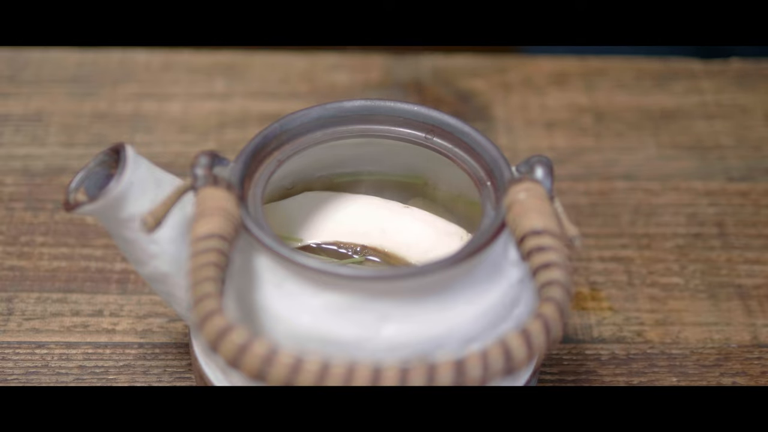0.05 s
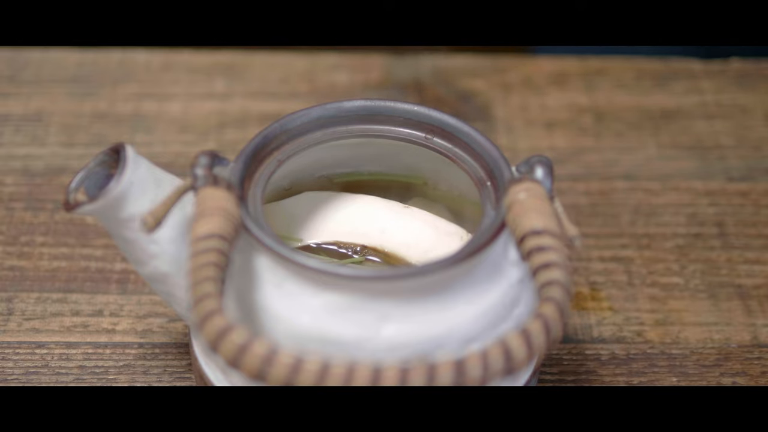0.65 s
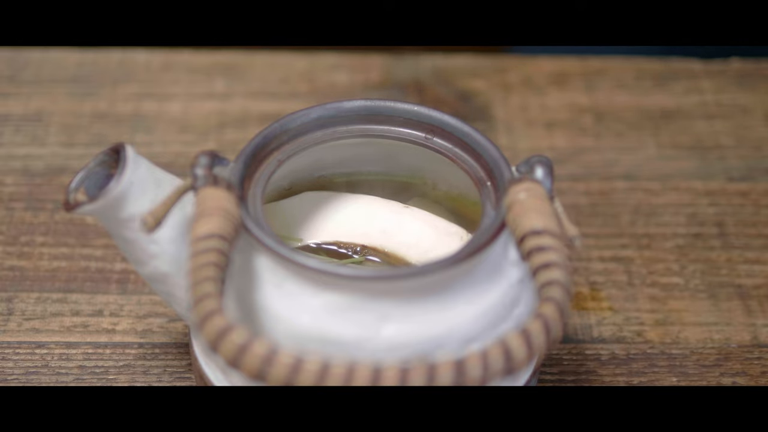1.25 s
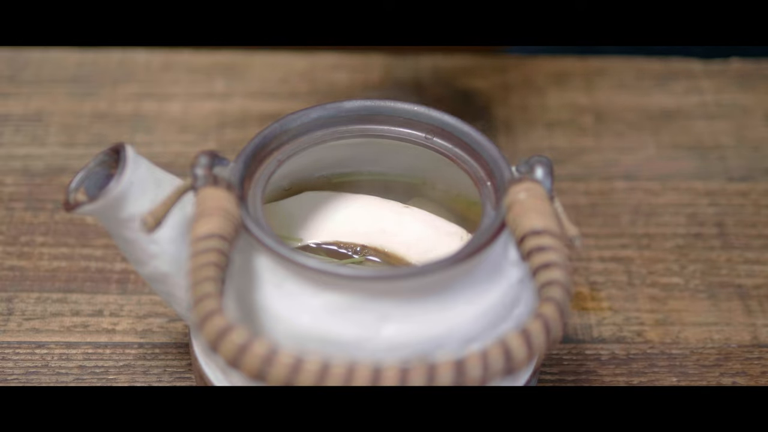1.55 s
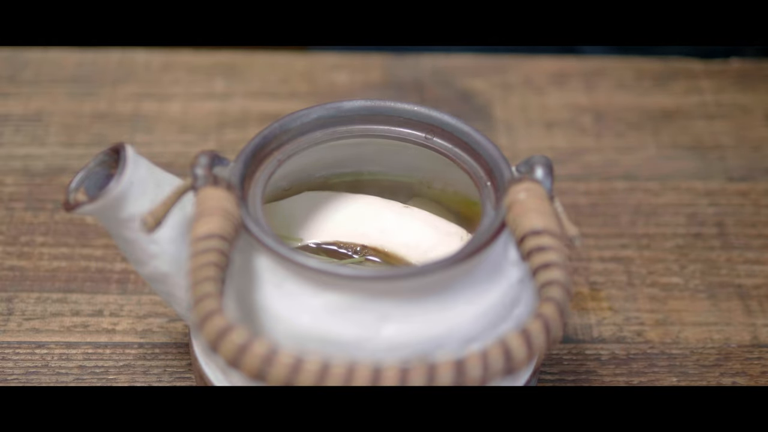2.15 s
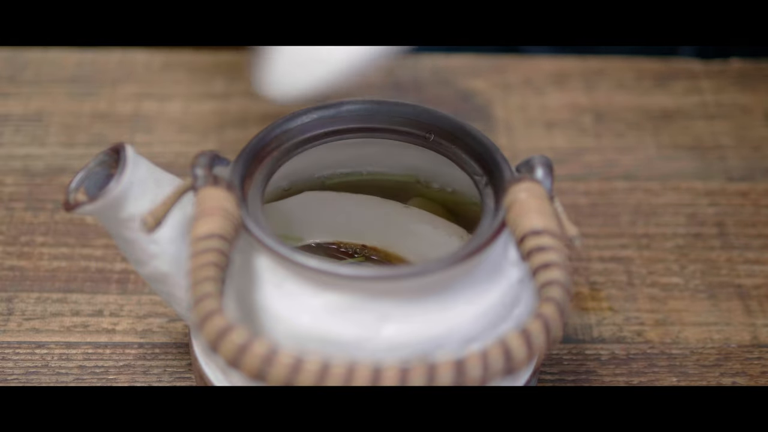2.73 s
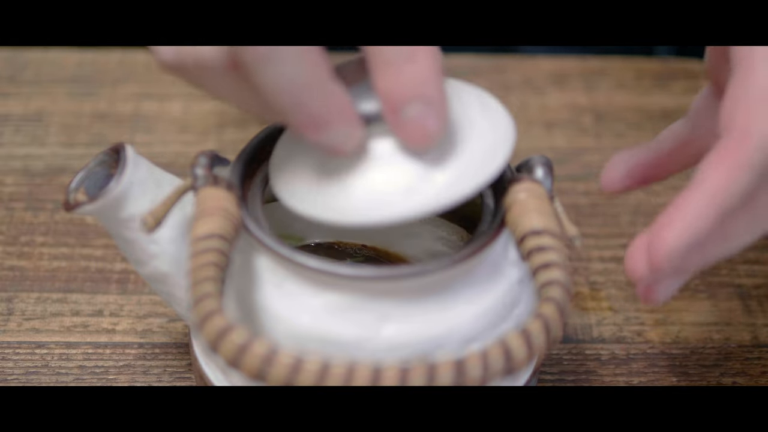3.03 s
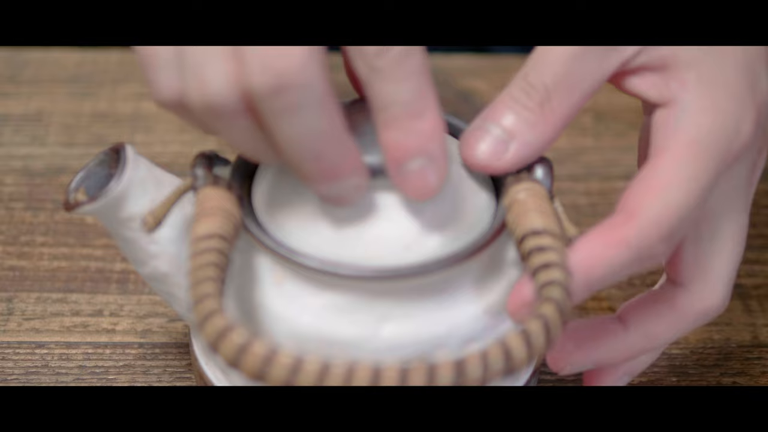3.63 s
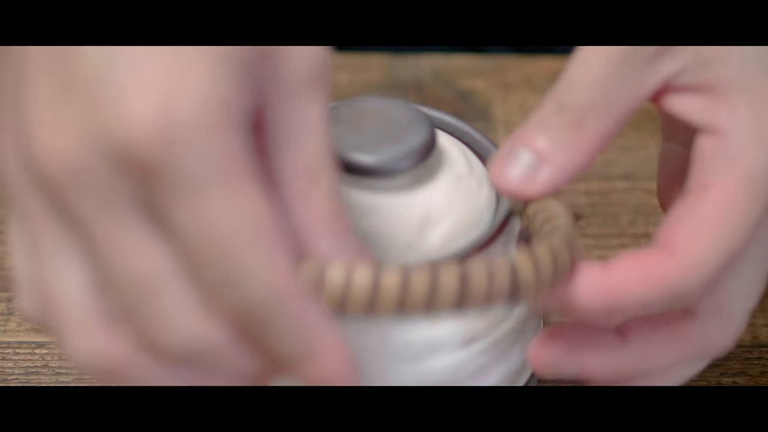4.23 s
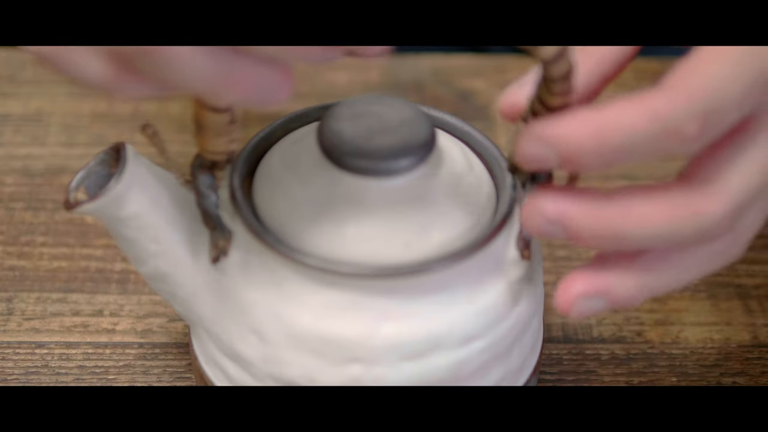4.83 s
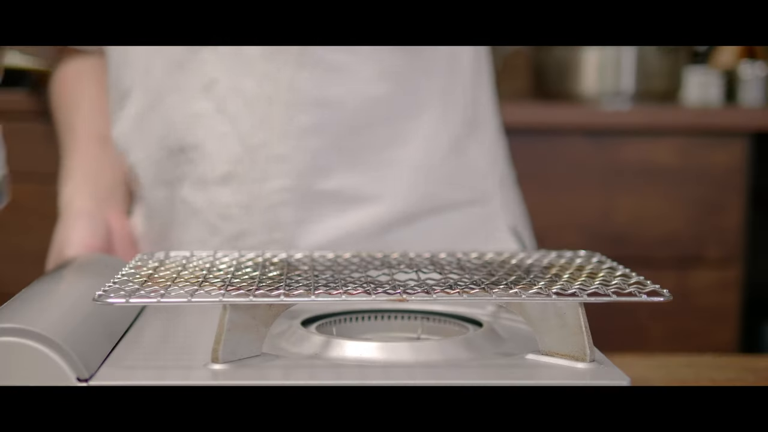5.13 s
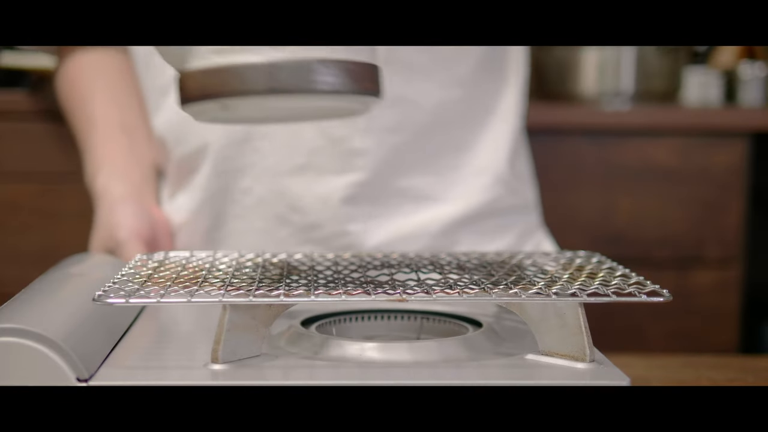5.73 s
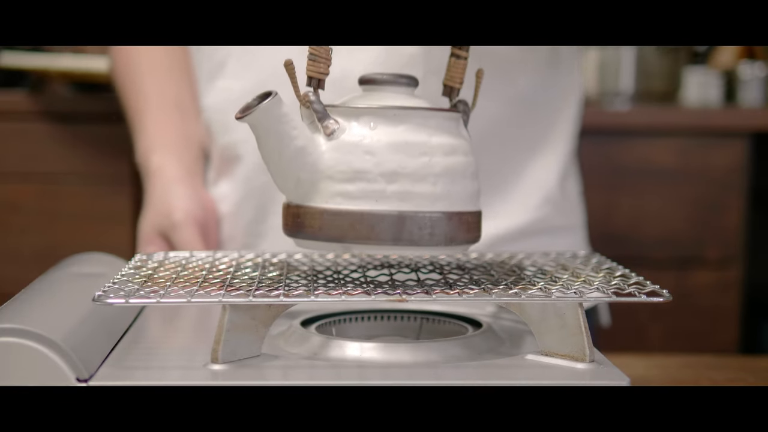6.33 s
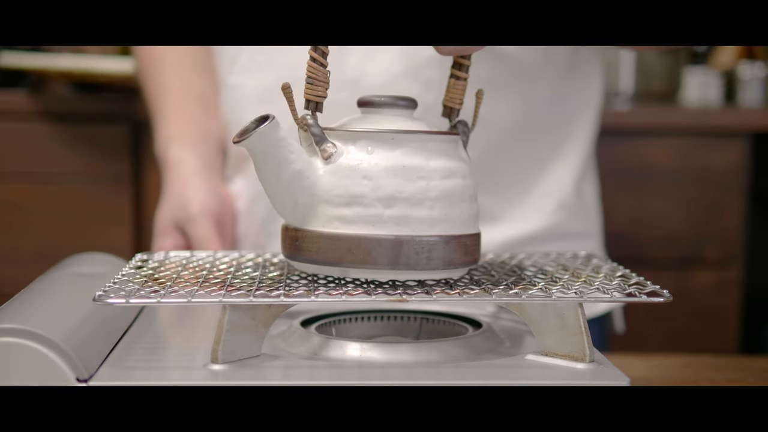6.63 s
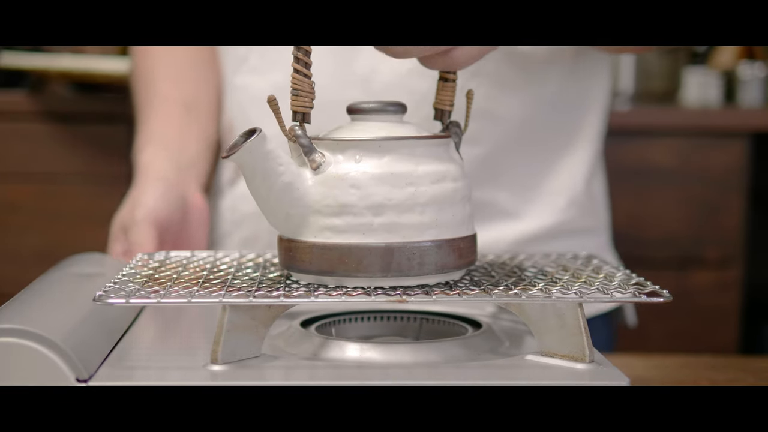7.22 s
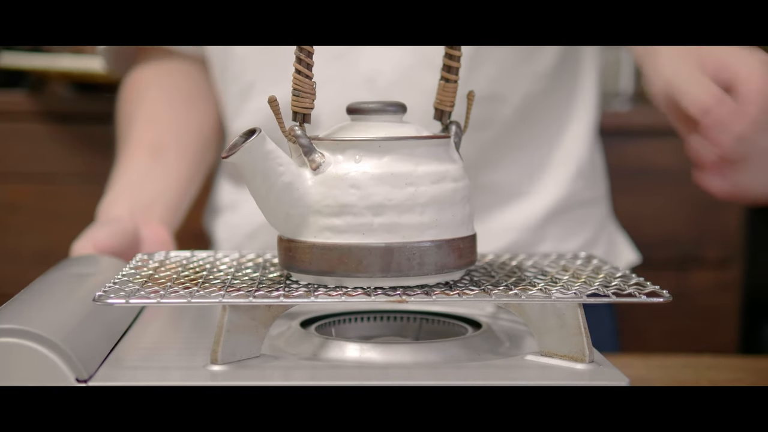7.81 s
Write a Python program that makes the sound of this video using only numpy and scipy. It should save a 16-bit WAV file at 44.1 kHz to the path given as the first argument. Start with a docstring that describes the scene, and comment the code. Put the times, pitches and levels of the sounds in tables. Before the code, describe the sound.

Close kitchen sounds: a kettle clinking down on a table, a teapot lid knocking, the pot rattling onto wire mesh, and igniter clicks.

```python
"""A metal kettle scrapes, clinks and is set down on a wooden table, close by in a small kitchen.
A lid is fitted on a ceramic teapot and its wrapped handle is raised; the pot lands twice on a wire
grill, and a gas burner's knob clacks and snaps its igniter. Each impact excites damped modes: a few
clear partials over a crowd of weaker ones, modelled as decaying noise. Sliding contact gives friction
noise, and ventilation hums softly throughout. The sound is nearly mono."""
import sys
import numpy as np
from scipy import signal
from scipy.fft import rfft, irfft, next_fast_len
from scipy.io import wavfile
from scipy.ndimage import map_coordinates

SR = 44100
rng = np.random.default_rng(int(sys.argv[2]) if len(sys.argv) > 2 else 0)


def persist_wave(psi):
    """Save psi, clipped to +-1, as 16-bit WAV."""
    counts = np.round(np.clip(psi, -1, 1) * 32767).astype(np.int16)
    wavfile.write(sys.argv[1], SR, np.atleast_2d(counts).T)


N = 347067
TOP_HZ = 15830  # band limit
T = np.arange(SR * 3 // 5) / SR  # time within one contact, s


def amp(db):
    """Decibels to amplitude ratio."""
    return 10 ** (np.asarray(db) / 20)


def unit(x):
    """Normalisation to rms 1."""
    return x / np.sqrt(np.mean(x ** 2) + 1e-20)


def unit_onset(x):
    """Normalisation to rms 1 over the first 20 ms."""
    return x / np.sqrt(np.mean(x[:SR // 50] ** 2) + 1e-20)


def along(points, hz):
    """Interpolation of (frequency_hz, value) points on a log axis."""
    knots_hz, values = np.transpose(points)
    return np.interp(np.log(hz + 1), np.log(knots_hz + 1), values)


def wobble(rate):
    """Smooth random modulation with rate knots a second."""
    knots = rng.standard_normal(int(N * rate / SR) + 4)
    return map_coordinates(knots, [np.arange(N) * rate / SR])


def swell(peak_s, length_s):
    """A skewed Gaussian envelope that fades half as fast as it rises."""
    u = (np.arange(N) / SR - peak_s) / length_s
    return np.exp(-np.minimum(np.where(u < 0, -4 * u, 2 * u), 10) ** 2)


def filtered(x, response):
    """Linear filtering: the spectrum times a frequency response."""
    n = x.shape[-1]
    size = next_fast_len(n + SR // 4)
    return irfft(rfft(x, size) * response(np.fft.rfftfreq(size, 1 / SR)), size)[..., :n]


def coloured(x, spectrum):
    """Spectral shaping by (frequency_hz, gain_db) points."""
    return filtered(x, lambda hz: amp(along(spectrum, hz)))


def resonated(x, peaks):
    """Forced response of parallel resonators of alternating polarity."""
    return filtered(x, lambda f: sum(
        (-1) ** k * amp(db) * 1j * f * width / (hz * hz - f * f + 1j * f * width)
        for k, (hz, width, db) in enumerate(peaks)))


def causal_pulse(spectrum, size=4096):
    """Minimum phase: the most compact causal pulse with a given spectrum."""
    magnitude = amp(along(spectrum, np.fft.rfftfreq(size, 1 / SR)))
    cepstrum = irfft(np.log(magnitude))
    cepstrum[1:size // 2] *= 2
    cepstrum[size // 2 + 1:] = 0
    return irfft(np.exp(rfft(cepstrum)))


def dying_noise(decay, size=128):
    """Frequency-dependent damping of noise, set by (frequency_hz, t60_s) points."""
    hz, t, spectra = signal.stft(rng.standard_normal(len(T)), SR, nperseg=size)
    damping = amp(-60 * t / along(decay, hz)[:, None])
    return signal.istft(spectra * damping, SR, nperseg=size)[1][:len(T)]


def struck(contacts, modes, crowd, decay, cross_hz, ring_db, crack_db, rise_s, gain_db):
    """Modal superposition; a contact's body and edge are relative levels below and above cross_hz."""
    out = np.zeros(N + SR)
    hz, db, t60 = np.transpose(modes)[:, :, None]
    force = 1 - np.exp(-T / rise_s)  # builds as the surfaces press together
    partials = amp(db - 60 * T / t60) * np.sin(2 * np.pi * hz * T) * force
    # a body radiates little below its lowest mode
    radiation = signal.butter(3, hz.min() * 3 / 4, "high", fs=SR, output="sos")
    partials = signal.sosfilt(radiation, partials)
    pulse = causal_pulse(crowd)
    crack = force * (1 + amp(crack_db - 60 * T / 0.025))
    bands = [signal.butter(4, cross_hz, kind, fs=SR, output="sos") for kind in ("low", "high")]
    common = dying_noise(decay)  # part of the crowd is the same wherever the object is hit
    for start_s, *levels in contacts:
        ring = amp(rng.normal(0, 2, len(modes))) @ partials
        dense = signal.fftconvolve((common + dying_noise(decay)) * crack, pulse)[:len(T)]
        blow = amp(ring_db) * unit_onset(ring) + unit_onset(dense)
        # a harder contact puts more of its energy above the crossover
        for band, band_db in zip(bands, levels):
            part = unit_onset(signal.sosfilt(band, blow))
            out[round(start_s * SR):][:len(T)] += amp(band_db + gain_db) * part
    return out[:N]


def rebounding(blows, flight_s, dulling_db):
    """Inelastic rebound: one weaker, duller contact follows each blow."""
    contacts = []
    for start_s, body, edge, loss in blows:
        contacts.append((start_s, body, edge))
        contacts.append((start_s + flight_s, body - loss, edge - loss - dulling_db))
    return contacts


# spectrum of the moving air: frequency_hz, density_db
AIR_SPECTRUM = [(15, -31), (25, -26.5), (48, -2.5), (167, -2.5), (191, 0.5), (257, -8.5), (326, -10),
                (394, -13), (501, -14.5), (729, -16.5), (790, -17.5), (1460, -23), (1810, -28.5),
                (3900, -29.5), (4900, -34.5), (15000, -39.5)]
# duct resonances: pitch_hz, width_hz, gain_db
DUCT_MODES = [(126, 6.7, -8.5), (201.4, 14, 4), (244, 64, -0.5), (320, 18.8, 5), (459.5, 42, -6)]
# course of the draught: time_s, level_db
DRAUGHT_LEVELS = [(0, -52), (3.2, -52.5), (6.2, -54.5), (7.87, -52)]


def ventilation():
    """Broadband flow noise with a soft drone from duct resonance."""
    rush = unit(coloured(rng.standard_normal(N), AIR_SPECTRUM))
    drone = amp(-6) * unit(resonated(rng.standard_normal(N), DUCT_MODES))
    level_db = np.interp(np.arange(N) / SR, *np.transpose(DRAUGHT_LEVELS))
    return (rush + drone) * amp(level_db)


# spectrum of the noise that differs between channels: frequency_hz, density_db
STRAY_SPECTRUM = [(15, -55), (25, -29), (278, -8.5), (363, -14), (438, -0.5), (709, -23.5), (978, -20.5),
                  (1420, -39.5), (15000, -41.5)]


def stray_noise():
    """Decorrelation: faint independent noise widens the background."""
    return amp(-65) * unit(coloured(rng.standard_normal(N), STRAY_SPECTRUM))


# decay of the diffuse tail: frequency_hz, t60_s
TAIL_DECAY = [(100, 0.034), (1000, 0.13), (5000, 0.22), (15000, 0.24)]


def smeared(x, delay_s=0.014):
    """Convolution with decaying noise spreads each sound into a short diffuse tail."""
    tail = dying_noise(TAIL_DECAY)
    delayed = np.pad(x, (int(delay_s * SR), 0))
    return signal.fftconvolve(delayed, tail / np.linalg.norm(tail))[:N]


# rubs and squeaks of kettle, lid, hands and handle: peak_s, length_s, centre_hz, width_hz, level_db
RUBS = [(0.334, 0.049, 3560, 2180, -46.5), (0.349, 0.07, 2060, 1670, -51.5),
        (0.797, 0.048, 3700, 600, -34.5), (0.872, 0.016, 4300, 520, -27), (1.878, 0.11, 3800, 2000, -60),
        (1.935, 0.051, 4060, 4040, -51), (1.958, 0.11, 99, 90.5, -41.5), (2.061, 0.092, 441, 144, -40.5),
        (2.156, 0.3, 3630, 2000, -61), (2.184, 0.043, 3670, 1870, -42.5), (2.302, 0.082, 417, 330, -37.5),
        (2.297, 0.041, 910, 890, -47), (3.445, 0.037, 3410, 198, -39), (3.436, 0.046, 7620, 200, -48),
        (4.537, 0.077, 1095, 290, -51.5), (4.535, 0.067, 3440, 3000, -58)]


def rubbing():
    """Sliding friction: each stroke is a swell of band-limited noise."""
    out = np.zeros(N)
    for peak_s, length_s, hz, width, db in RUBS:
        upper_hz = hz + width / 2
        band = signal.butter(2, [hz * hz / upper_hz, min(upper_hz, TOP_HZ)], "band", fs=SR, output="sos")
        out += amp(db) * swell(peak_s, length_s) * unit(signal.sosfilt(band, rng.standard_normal(N)))
    return out


# clicks of knob and igniter: start_s, body_db, edge_db, rebound_loss_db
KNOB_CLICKS = [(7.616, -25.5, -69, 4), (7.648, -39, -31, 1.5), (7.738, -30.5, -49.5, 7.5)]
# clear modes: pitch_hz, level_db, t60_s
KNOB_MODES = [(968, 18.5, .07), (1230, -12, .06), (1590, -1, 0.11), (1780, 5, 0.042), (3570, -14, 0.043),
              (5330, -6, 0.079)]
# crowd of weaker modes: frequency_hz, density_db
KNOB_CROWD = [(300, -13), (800, -14.5), (1000, 1), (1600, -2), (2100, -18), (3400, -14.5), (3950, -1),
              (4700, -16), (5400, -12), (6800, -25), (10300, -27), (15000, -47)]


def burner():
    """Spring release: the knob clacks over its stop and the igniter snaps, each striking twice."""
    clicks = rebounding(KNOB_CLICKS, flight_s=0.016, dulling_db=6.5)
    return struck(clicks, KNOB_MODES, KNOB_CROWD, decay=[(1000, 0.19), (4000, 0.16), (12000, 0.067)],
                  cross_hz=2630, ring_db=-1, crack_db=-5.5, rise_s=0.0012, gain_db=-3)


# the pot's foot meets the wires: start_s, body_db, edge_db
POT_LANDINGS = [(6.583, -23.5, -41), (6.589, -22.5, -32.5), (6.616, -26.5, -37.5), (6.859, -42, -51.5),
                (6.872, -30.5, -47), (6.896, -24.5, -44), (6.91, -34.5, -34.5), (6.927, -28, -49.5)]
# clear modes: pitch_hz, level_db, t60_s
GRILL_MODES = [(158, -6, 0.3), (345, -39, .15), (508, 11.5, 0.2), (690, 13, 0.3), (747, 1, 0.28),
               (752, -8.5, 1.46), (950.4, 16.5, 0.18), (1430, 5, 0.26), (1646, -4, 0.21), (2290, -8, .15),
               (2800, -24, 0.17), (3590, -14, 0.14), (7030, -11, 0.17), (12140, -22, .18)]
# crowd of weaker modes: frequency_hz, density_db
GRILL_CROWD = [(60, -8), (170, -3), (300, -2), (520, 5), (900, -1.5), (1150, -9), (1600, -8.5),
               (2000, -16.5), (3600, -15), (4800, -24), (7300, -24), (10500, -34.5), (11900, -25),
               (12700, -51)]


def grill():
    """Repeated impact: the pot's weight rattles the wire mesh on its sheet-metal supports."""
    return struck(POT_LANDINGS, GRILL_MODES, GRILL_CROWD,
                  decay=[(500, 0.31), (4000, 0.15), (12000, 0.13)],
                  cross_hz=2010, ring_db=-0.5, crack_db=-36.5, rise_s=0.00027, gain_db=-2.5)


# ticks in the handle's lugs: start_s, body_db, edge_db
HANDLE_TICKS = [(4.018, -85, -55), (4.186, -57.5, -74), (4.396, -59, -68.5), (4.621, -50.5, -49.5),
                (4.641, -52, -58.5), (4.67, -44.5, -63), (4.736, -51, -66)]
# clear modes: pitch_hz, level_db, t60_s
HANDLE_MODES = [(1086, -13, 0.048), (2990, -15, 0.1), (3560, -11.5, 0.074)]
# crowd of weaker modes: frequency_hz, density_db
HANDLE_CROWD = [(400, 11), (1100, -9), (1900, 1), (3100, 6), (4800, -13.5), (9000, 0), (15000, -2.5)]


def handle():
    """Impulsive excitation: the teapot's handle ticks as it turns upright."""
    return struck(HANDLE_TICKS, HANDLE_MODES, HANDLE_CROWD, decay=[(1000, 0.21), (12000, 0.05)],
                  cross_hz=4860, ring_db=-9, crack_db=9, rise_s=0.00038, gain_db=-2)


# spectrum of fingers on the wrapping: frequency_hz, density_db
RUSTLE_SPECTRUM = [(800, 0), (2000, -4.5), (3500, 12), (5500, 1), (9000, 9), (13000, 2), (15500, 7)]


def wrapping(grip_s=3.99, release_s=4.97, fade_s=0.095):
    """Fibre friction: the handle's wrapping rustles while held, and snaps and creaks at each tick."""
    t = np.arange(N) / SR
    held = np.clip(np.minimum(t - grip_s, release_s - t) / fade_s, 0, 1)
    strain = held * amp(-68 + 2.5 * wobble(12))
    snap = amp(10) * np.exp(-T / 0.00093)
    creak = amp(-4) * np.exp(-T / 0.028)
    for start_s, _, edge_db in HANDLE_TICKS:
        strain[round(start_s * SR):][:len(T)] += amp(edge_db) * (snap + creak)
    fibres = rng.standard_normal(N) * amp(4 * wobble(900))  # slips in tiny uneven bursts
    return strain * unit(coloured(fibres, RUSTLE_SPECTRUM))


# the lid meets the teapot's rim: start_s, body_db, edge_db, rebound_loss_db
LID_TAPS = [(3.351, -21.5, -32.5, 0.5), (3.433, -27.5, -66, 2), (3.564, -30.5, -53, 4),
            (3.57, -15.5, -34.5, 26), (3.636, -32.5, -61, 0.5)]
# clear modes: pitch_hz, level_db, t60_s
POT_MODES = [(230, -9, .16), (325, -13, .12), (461, -2, .11), (574, 0, .1), (744, -1, .12), (944, -7, .09),
             (1028, -7, .09), (1368, -16, .09), (1635, -11, .09), (1765, -13, .08), (2210, -19, .09),
             (2490, -18, .09), (2600, -19, .08), (3420, -12, .1), (3490, -15, .09), (7230, -31, .08),
             (7600, -23, .13), (7660, -23, .13), (14950, -38, .15)]
# crowd of weaker modes: frequency_hz, density_db
POT_CROWD = [(100, -30.5), (300, -9.5), (500, 0), (800, 1), (1250, -11), (1750, -9), (2100, -24),
             (3000, -15.5), (3500, -7.5), (4100, -46), (5600, -53), (7500, -28), (8500, -48), (15000, -48)]


def lid():
    """Damped vibration: fingers hold the ceramic lid, so it knocks only briefly."""
    taps = rebounding(LID_TAPS, flight_s=0.019, dulling_db=6.5)
    return struck(taps, POT_MODES, POT_CROWD, decay=[(400, 0.24), (8000, 0.034)],
                  cross_hz=2080, ring_db=-0.5, crack_db=10.5, rise_s=0.00082, gain_db=-1.5)


# the kettle's loose parts collide: start_s, body_db, edge_db
CLACKS = [(.946, -28.5, -26.5), (1.008, -33.5, -40), (1.529, -31.5, -29.5), (1.543, -26.5, -34.5),
          (1.584, -42, -43), (1.772, -40, -44)]
# clear modes: pitch_hz, level_db, t60_s
CLACK_MODES = [(1222, 1, 0.2), (1315, 11, 0.16), (1610, 8, 0.11), (2000, -7, 0.19), (2340, -14, 0.12),
               (2627, -1.5, 0.16), (3920, -13.5, 0.19), (5090, -12, 0.14), (5320, -9.5, 0.16),
               (5830, -7, 0.115)]
# crowd of weaker modes: frequency_hz, density_db
CLACK_CROWD = [(100, -59), (450, -33.5), (800, 7.5), (1300, 9), (2000, 5), (3100, -10.5), (4000, -2),
               (5700, -6), (8500, -8.5), (9500, -18), (10500, -24.5), (15000, -47)]


def loose_parts():
    """Rattling contact: each collision rings the kettle's loose parts."""
    return struck(CLACKS, CLACK_MODES, CLACK_CROWD, decay=[(1000, 0.18), (10000, 0.11)],
                  cross_hz=2830, ring_db=-1, crack_db=-17, rise_s=0.0011, gain_db=-2)


# blows on the table top: start_s, body_db, edge_db
THUMPS = [(1.001, -4.5, -14.5), (1.036, -14.5, -34), (1.078, -26.5, -58), (1.249, -21.5, -63),
          (1.465, -16.5, -29.5), (1.479, -22, -23.5), (1.525, -14.5, -10.5), (1.541, -11, -20),
          (1.559, -27, -18), (1.591, -31, -27.5), (1.755, -11, -23), (3.351, -39, -28), (4.644, -35, -57),
          (4.665, -38, -59), (4.735, -40, -53), (6.32, -39.5, -73), (6.6, -31, -42)]
# clear modes: pitch_hz, level_db, t60_s
TABLE_MODES = [(82, -11, .15), (118, 0, .2), (160, -2, .14), (236, -2, .25), (354, -4.5, .22),
               (436, -11, .16), (482, -8, .17), (580, -15, .14)]
# crowd of weaker modes: frequency_hz, density_db
TABLE_CROWD = [(25, -40), (50, -20), (75, -1), (105, 11.5), (260, 4.5), (480, -2), (620, -2), (850, -20.5),
               (1500, -33.5), (4000, -54.5)]


def table_top():
    """Plate vibration: the wood thumps in its low modes, loudest under the kettle's base."""
    return struck(THUMPS, TABLE_MODES, TABLE_CROWD, decay=[(100, 0.26), (900, 0.15)],
                  cross_hz=302, ring_db=2.5, crack_db=-7.5, rise_s=0.00025, gain_db=-5.5)


# light taps on the kettle: start_s, body_db, edge_db
CLINKS = [(0.731, -30.5, -34), (0.767, -27, -47), (0.838, -36, -56), (0.869, -25, -41.5), (0.893, -32, -59),
          (0.946, -19.5, -27.5)]
# clear modes: pitch_hz, level_db, t60_s
KETTLE_MODES = [(1202, 2, .22), (1237, -9, .13), (1424, -21, .1), (1692, -19, .21), (2048, -21, .12),
                (2245, -11, .2), (2688, -23, .22), (3455, -10, .11), (3650, -7, .11), (3788, -6, .12),
                (4373, -6, .11), (4502, -10, .09), (4650, -8, .1), (5346, -16, .12), (7332, -19, .09),
                (8107, -25, .12)]
# crowd of weaker modes: frequency_hz, density_db
KETTLE_CROWD = [(300, -30.5), (800, -22), (1250, 0), (1900, -8.5), (2400, -13.5), (3000, -2), (3700, 3),
                (4600, -21), (6000, -9), (7600, -4), (10000, -24.5), (15000, -37)]


def kettle_clinks():
    """Free vibration: the metal shell rings on after each tap."""
    return struck(CLINKS, KETTLE_MODES, KETTLE_CROWD, decay=[(1000, 0.12), (10000, 0.2)],
                  cross_hz=2700, ring_db=9, crack_db=-22, rise_s=0.0025, gain_db=-2.5)


# slides of the kettle: peak_s, length_s, relative_level_db
SCRAPES = [(0.003, 0.053, -52), (0.213, 0.13, -37.5), (0.58, 0.13, -46), (0.717, 0.15, -39.5),
           (0.81, 0.15, -39)]
# spectrum of the sliding hiss: frequency_hz, density_db
SCRAPE_HISS = [(1000, -16.5), (2800, -33.5), (4000, 2.5), (5500, -22.5), (7200, -11.5), (10000, -33),
               (15000, -53)]


def kettle_scrapes(catch_db=2, catches_per_s=70):
    """Stick-slip friction: tiny slips of metal on metal keep the kettle's modes sounding."""
    slips = rng.standard_normal(N) * amp(0.78 * wobble(300) + catch_db * wobble(catches_per_s))
    # a mode's width follows from its decay; sliding favours the upper ones
    ring = resonated(slips, [(hz, np.log(1000) / np.pi / t60, db) for hz, db, t60 in KETTLE_MODES])
    ring = coloured(ring, [(1200, -3), (1700, 4), (2250, -2), (2700, 13),
                           (3400, 6.5), (4500, 3.5), (8000, 3)])
    hiss = unit(coloured(rng.standard_normal(N), SCRAPE_HISS))
    strokes = sum(amp(db) * swell(peak_s, length_s) for peak_s, length_s, db in SCRAPES)
    return amp(-4.5) * (unit(ring) + amp(-5) * hiss) * strokes


def scene():
    """Mid-side stereo: only a faint, low, smeared copy of the knocks and a little noise differ."""
    kettle = kettle_clinks() + table_top() + loose_parts() + kettle_scrapes()
    teapot = lid() + handle() + wrapping()
    direct = kettle + teapot + grill() + burner() + rubbing()
    walls = amp(-15) * smeared(direct)
    mid = direct + walls + ventilation()
    side = coloured(smeared(direct), [(100, -63), (350, -40), (700, -55.5), (1500, -75), (12000, -53)])
    side += stray_noise()
    return np.array([mid + side, mid - side])


def record(dry):
    """Band limiting and clipping: deep bass is shed, peaks stop at full scale, the top is cut."""
    lean = signal.sosfilt(signal.butter(2, 35, "high", fs=SR, output="sos"), dry)
    return filtered(np.clip(lean, -1, 1), lambda hz: hz < TOP_HZ)


dry = scene()
out = record(dry)
persist_wave(out)
```